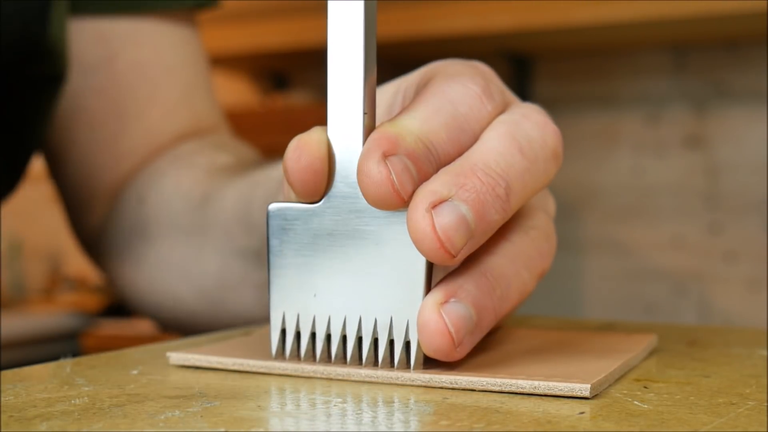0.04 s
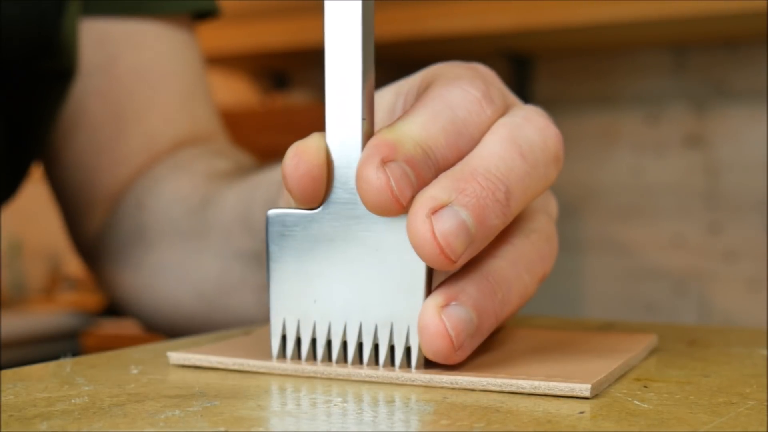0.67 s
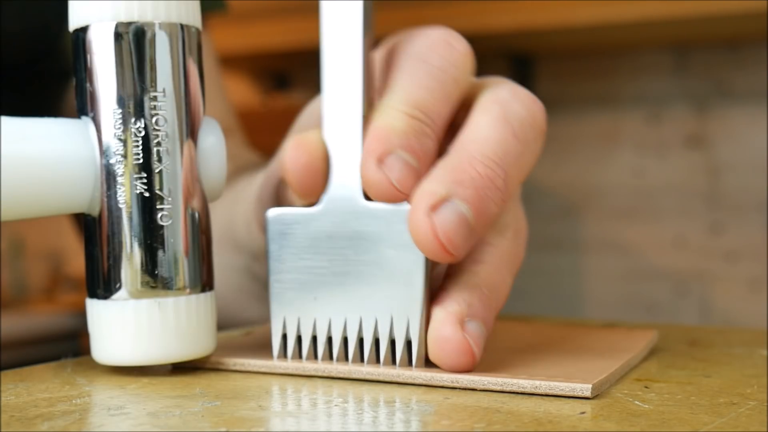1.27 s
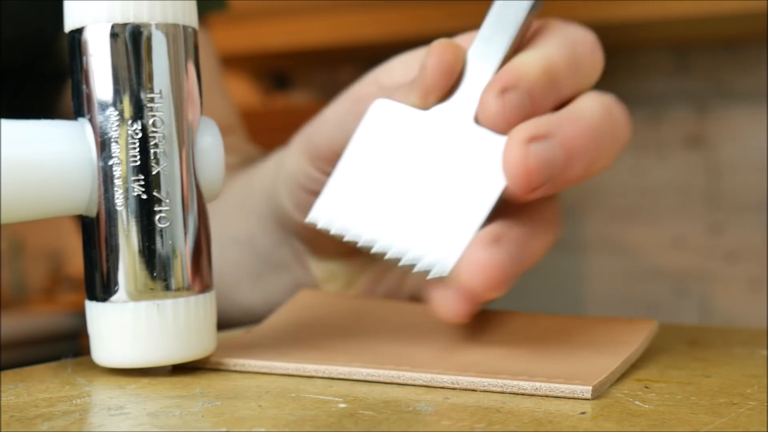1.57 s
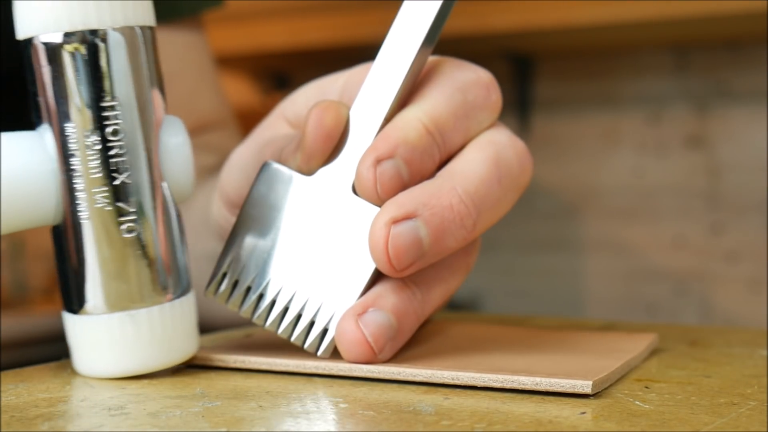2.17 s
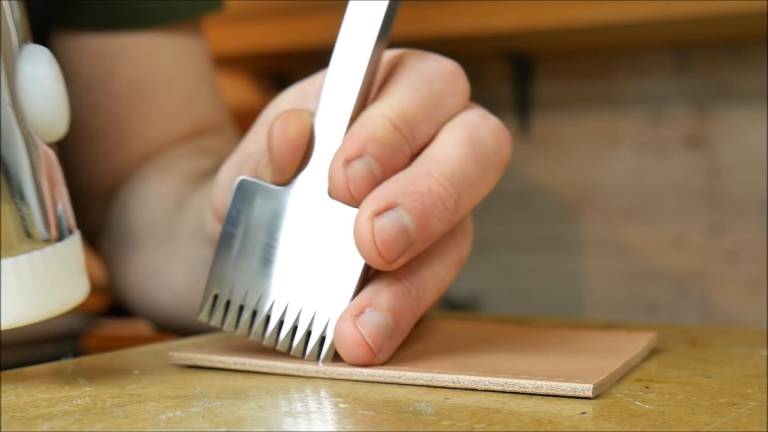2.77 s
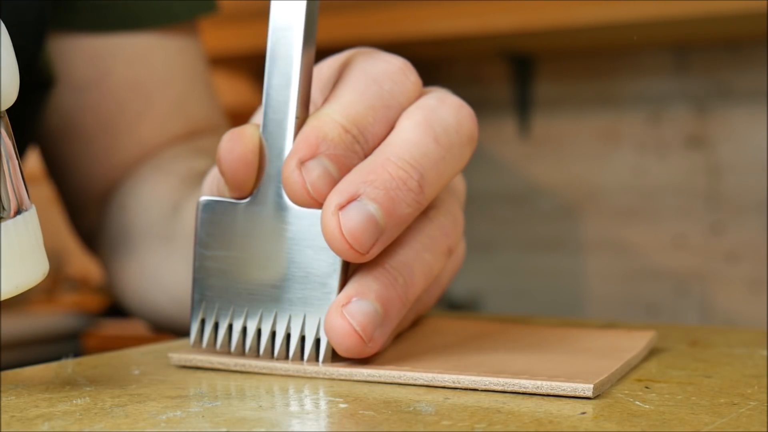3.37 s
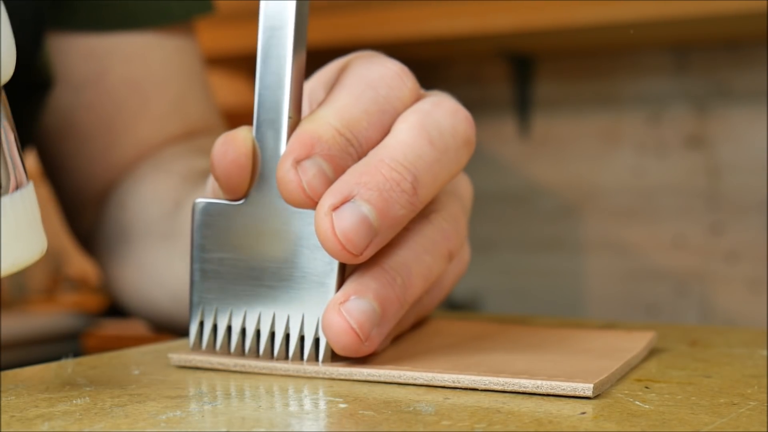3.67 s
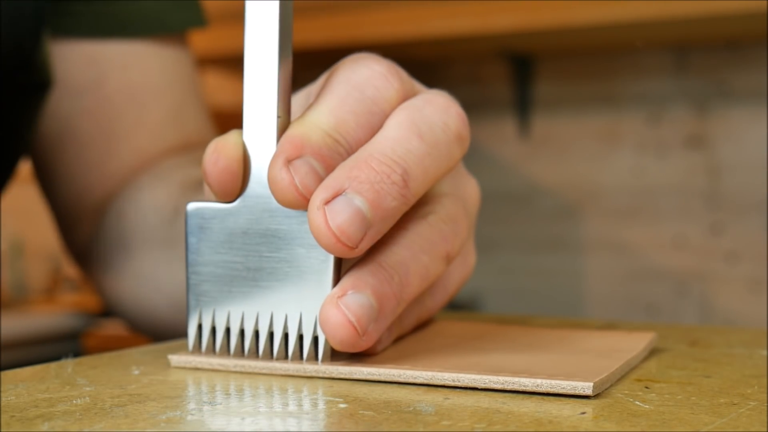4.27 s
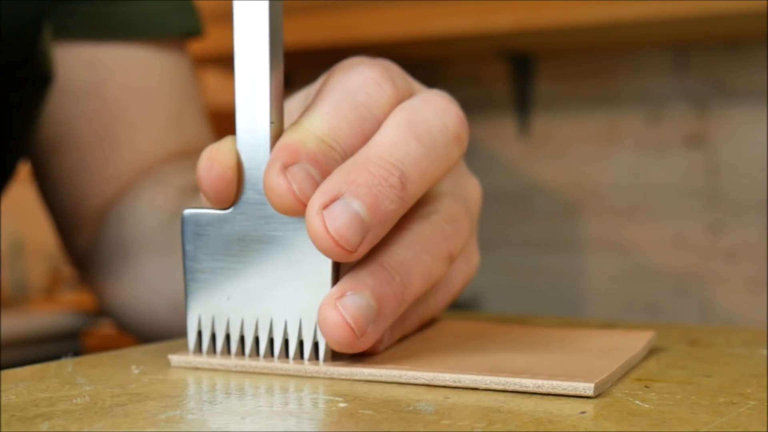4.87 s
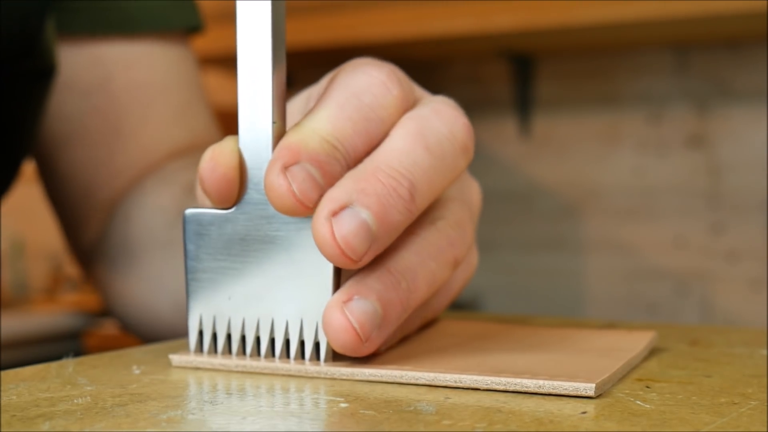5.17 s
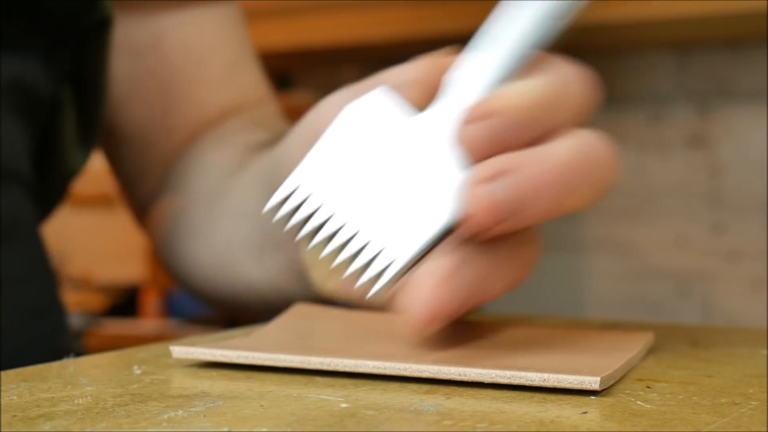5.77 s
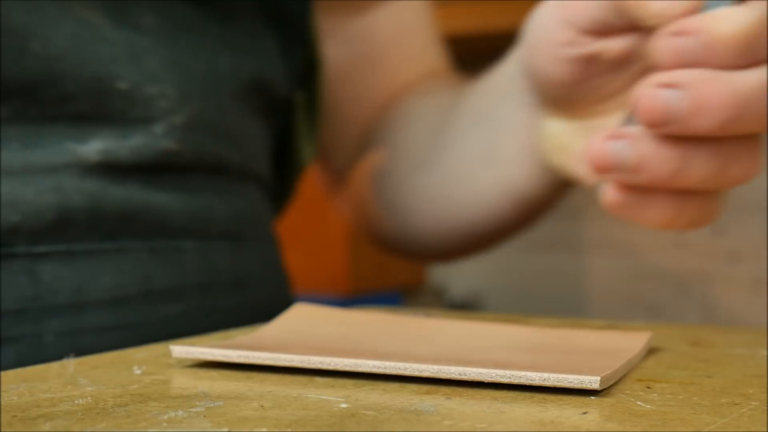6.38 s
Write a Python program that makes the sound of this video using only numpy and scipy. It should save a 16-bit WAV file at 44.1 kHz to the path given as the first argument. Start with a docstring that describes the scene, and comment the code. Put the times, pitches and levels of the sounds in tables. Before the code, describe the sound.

A plastic-faced mallet strikes a toothed steel punch into leather on a wooden bench at about 0.2 seconds, then harder at 0.6. Each blow is a sharp, close knock with a brief metallic ring and a low bench thump, slightly overloading the microphone, followed by small clicks and the quick rattle of a loose object settling. Around 1.2 seconds the mallet is set down with a soft thud and a few clicks. Very faint leather rubs and a slight bump follow until about 2.4 as the punch is pulled out and moved. After a near-silent pause, a duller setting blow lands at 4.5 seconds and a hard, cracking one at 4.9, leaving a faint steel ring and bench rumble. From 5.2 to 6.4, barely audible rubs and finger ticks come as the punch is worked loose. Behind everything is a small quiet workshop with soft arm rustle.

```python
"""A nylon-faced mallet drives a steel pricking iron into leather on a wooden bench: a setting blow, then
a hard one, twice over. The blows bounce the iron, ring and sway the bench and overload the close
microphone; the first two set a loose object chattering. Between the pairs the mallet is put down and
the iron is pulled out and moved along, with clicks and leather rubs; after the last it is worked loose
again. Behind it all: a small quiet workshop, with soft swells of arm rustle and bench rumble."""
import sys
import numpy as np
from scipy import signal
from scipy.fft import rfft, irfft
from scipy.io import wavfile

SR = 44100
rng = np.random.default_rng(int(sys.argv[2]) if len(sys.argv) > 2 else 0)


def waveform_to_disk(signal):
    """Save audio, clipped to [-1, 1], as 16-bit WAV at the path in sys.argv[1]."""
    frames = np.transpose(np.atleast_2d(signal))
    scaled = np.clip(frames, -1, 1) * 32767
    samples = np.round(scaled).astype(np.int16)
    wavfile.write(sys.argv[1], SR, samples)


N = 284004
TIME_S = np.arange(N) / SR
AGE_S = TIME_S[:SR * 3 // 5]   # time since a contact
BANDS_HZ = 50 * 2 ** (np.arange(34) / 4)

# Spectra. Each row: frequency in Hz, relative density in dB.
ROOM_TONE_SPECTRUM = [(25, -6), (60, -10), (90, -6), (128, 0), (160, -11), (240, -12.5), (360, -25.5),
                      (600, -28.5), (1200, -33.5), (3000, -38), (8000, -40), (15500, -41.5)]
LOW_SWELL_SPECTRUM = [(60, -11.5), (220, 0), (450, -6), (1000, -16.5), (2400, -19), (6000, -27.5),
                      (15000, -40.5)]
RUB_SPECTRUM = [(200, 0.5), (1200, 5), (3000, 3.5), (6000, -1), (8700, 2.5), (10500, -14), (14000, -4),
                (16000, -26)]
CLICK_SPECTRUM = [(60, -26.5), (200, -3.5), (600, -4), (1500, 2.5), (3000, -2.5), (6000, -1.5), (9200, -2),
                  (10800, -9.5), (14000, -10), (16000, -23.5)]
CHATTER_SPECTRUM = [(100, -25.5), (420, -16.5), (600, -25), (800, -25), (1200, -25), (1500, -31),
                    (1950, -27), (2500, -41), (4000, -60), (15000, -79.5)]
CRACK_SPECTRUM = [(300, -8), (1500, 3), (2500, 8), (4500, 1), (8000, -7), (15000, -14.5)]
TAIL_SPECTRUM = [(60, -14.5), (130, -6), (220, -4), (310, -6.5), (420, -3), (700, -10), (1250, -6.5),
                 (1600, -8.5), (2000, -7), (3000, -21), (5000, -22.5), (9000, -32), (13500, -36),
                 (16000, -49)]   # dense ring of bench and room

# Modes. Each row: frequency in Hz, relative level in dB, T60 in seconds.
SWAY_MODES = [(28.4, -39.5, 2.1), (34.8, -44, 2.7), (43.6, -32, 1.3), (54.93, -46.5, .9), (66, -38, 0.66),
              (88, -37.5, 0.73), (113.5, -45, 0.93)]   # bench rocking on its legs
BENCH_MODES = [(122, -26, .13), (155, -21, 0.026), (215.6, -12.5, 0.16), (249, -25, 0.028),
               (335, -26.5, 0.15), (390, -20, 0.21), (486, -25.5, .14), (770, -21.5, .03)]   # bench top
TOOL_MODES = [(1078, -73, 5.9), (1726, -67.5, 2.1), (2900, -81.5, 1.0), (6160, -80, .9)]   # steel tools nearby
IRON_MODES = [(928, -30.5, 0.11), (1218, -24, 0.25), (1247, -27, 0.13), (1295.7, -30, 0.22),
              (1469, -24, .22), (1578, -31.5, 0.081), (1993, -31.5, 0.16), (1977, -30.5, 0.25),
              (2110, -31.5, .16), (2574, -29.5, .14), (2910, -32, .12), (3370, -32.5, 0.09)]   # hand-damped iron and mallet head

# Workshop decay. Each row: frequency in Hz, T60 in seconds.
ROOM_DECAY = [(80, .4), (200, .3), (500, .28), (1300, .3), (3000, .26), (8000, .21), (15000, .175)]
# Soft low swells: arm rustle, and the bench's rumble lingering after the last blow.
# Each row: centre in seconds, half-width in seconds, level in dB.
LOW_SWELLS = [(.9, 1.6, -75), (4.35, .3, -72.5), (5.18, .22, -69), (5.75, .5, -75)]
# Slides on leather. Each row: peak in seconds, swell in seconds, level in dB, tilt in dB per octave.
SLIDES = [(1.52, .09, -74.5, -1), (1.722, .03, -70, 1), (2.26, 0.13, -77.5, -4.5), (5.23, .12, -80, 0.5),
          (5.52, 0.13, -72.5, -1.5), (5.775, .12, -72.5, 3), (6.41, .1, -73.5, -2)]
# Iron, mallet and finger contacts. Each row: start in seconds, level in dB, tilt in dB per octave.
LIGHT_CONTACTS = [(0.24, -29, 1), (.2620, -24.5, -1.5), (0.27, -35.5, 5), (0.695, -27, 0.5),
                  (1.172, -51.5, -3), (1.229, -43, -5), (1.246, -34.5, -3), (1.3076, -37, -0.5),
                  (2.411, -58.5, -6.5), (3.6825, -56.5, -4), (4.48, -31, 3.5), (5.4685, -57, -1.5),
                  (5.642, -54.5, -5.5), (6.038, -57, -0.5)]
# Mallet head landing on the bench. Each row: start in seconds, level in dB, contact corner in Hz.
HEAD_BUMPS = [(1.2391, -22, 257.5), (1.257, -36, 328), (2.135, -45, 220)]
# Bounce runs of the loose object. Each row: first landing in seconds, first gap in seconds.
CHATTER_RUNS = [(.336, .032), (.828, .0415)]
# Mallet blows. Each row: start in seconds, force in dB, contact corner in Hz, teeth crack in dB,
# iron bounce in Hz, bounce level in dB, bounce T60 in seconds, sway in dB, tool ring in dB.
MALLET_BLOWS = [(0.2170, -1, 2498, -14, 1130, -3, 0.018, -3, -13),
                (0.6175, 2, 2860, -1, 2030, 8.5, 0.0075, 0, -3),
                (4.453, -7, 1237, -9, 1135, 2, 0.028, -4, -13.5),
                (4.854, 2.5, 1920, -0.5, 1242, 10.5, 0.013, 2.5, 3)]


def from_db(db):
    """Decibels to gain."""
    return 10 ** (np.asarray(db) / 20)


def at_hz(points, hz):
    """Table lookup on a log-frequency axis."""
    known_hz, values = np.transpose(points)
    return np.interp(np.log(np.maximum(hz, 1)), np.log(known_hz), values)


def tilted(spectrum, db_per_oct):
    """Spectrum tilted about 3 kHz."""
    return [(hz, db + db_per_oct * np.log2(hz / 3000)) for hz, db in spectrum]


def add(track, start_s, sound):
    """Mix a sound into the track."""
    start = int(round(start_s * SR))
    track[start:start + len(sound)] += sound[:N - start]


def swell(peak_s, half_width_s):
    """Gaussian rise and fall."""
    return np.exp(-((TIME_S - peak_s) / half_width_s) ** 2)


def noise(spectrum):
    """Steady shaped noise."""
    gain = from_db(at_hz(spectrum, np.fft.rfftfreq(N, 1 / SR)))
    return irfft(rfft(rng.standard_normal(N)) * gain, N)


def butter(x, hz, kind):
    """Butterworth filter, 12 dB per octave."""
    return signal.sosfilt(signal.butter(2, hz, kind, fs=SR, output="sos"), x)


def soften(x, corner_hz):
    """A soft contact cuts the treble."""
    return butter(x, min(corner_hz, SR / 3), "low")


def ring(modes, age_s=AGE_S):
    """Struck modes: decaying sines of alternating sign."""
    return sum((-1) ** k * from_db(db - 60 * age_s / t60_s) * np.sin(2 * np.pi * hz * age_s)
               for k, (hz, db, t60_s) in enumerate(modes))


def snap(t60_s):
    """Decaying white burst."""
    return rng.standard_normal(len(AGE_S)) * from_db(-60 * AGE_S / t60_s)


def coloured(x, spectrum):
    """Minimum-phase shaping: nothing precedes the attack."""
    size = 2 * len(x)
    gain = from_db(at_hz(spectrum, np.fft.rfftfreq(size, 1 / SR)))
    cepstrum = irfft(np.log(gain))
    cepstrum[1:len(x)] *= 2
    cepstrum[len(x) + 1:] = 0
    return irfft(rfft(x, size) * np.exp(rfft(cepstrum)))[:len(x)]


def background(tone_db=-67):
    """Room tone and soft low swells of arm rustle and lingering bench rumble."""
    tone, low = noise(ROOM_TONE_SPECTRUM), noise(LOW_SWELL_SPECTRUM)
    swells = sum(from_db(db) * swell(centre_s, half_s) for centre_s, half_s, db in LOW_SWELLS)
    return from_db(tone_db) * tone / tone.std() + swells * low / low.std()


def room_bands(early_db=3, spacing_s=.0015, merge_s=.04):
    """Room decay, one row per quarter octave. Early treble reflections arrive singly, then merge."""
    white = rng.standard_normal((2, 2 * len(AGE_S)))
    edge = 2 ** (1 / 8)
    bands = np.array([butter(white[k % 2], [hz / edge, hz * edge], "band")[len(AGE_S):]
                      for k, hz in enumerate(BANDS_HZ)])
    early = np.interp(AGE_S / spacing_s, np.arange(1000), rng.standard_normal(1000))
    early *= np.exp(-AGE_S / merge_s)
    treble = BANDS_HZ[:, None] > 1500
    t60_s = at_hz(ROOM_DECAY, BANDS_HZ)[:, None]
    return bands * from_db(early_db * early * treble - 60 * AGE_S / t60_s)


def leather_rubs(grain_db=3, release_ratio=.48):
    """Fibres catch and let go under sliding teeth and fingers; each slide swells, then stops."""
    out = np.zeros(N)
    for peak_s, swell_s, db, db_per_oct in SLIDES:
        catches = np.interp(TIME_S, np.linspace(0, N / SR, 2000), rng.standard_normal(2000))
        slide = swell(peak_s, np.where(TIME_S < peak_s, swell_s, release_ratio * swell_s))
        out += from_db(db + grain_db * catches) * slide * noise(tilted(RUB_SPECTRUM, db_per_oct))
    return out


def finger_ticks(count=5, span_s=(5.35, 6.35), level_db=-64, spread_db=2, db_per_oct=-2):
    """Fingers tick on the iron as they work it loose. Rows as in LIGHT_CONTACTS."""
    return [(np.interp(when, [0, 1], span_s), level_db + spread_db * (2 * strength - 1), db_per_oct)
            for when, strength in rng.random((count, 2))]


def clicks(room, direct_db=1, t60_s=.014, room_db=-19):
    """Light contacts, each with a little room after it."""
    out = np.zeros(N)
    for start_s, db, db_per_oct in LIGHT_CONTACTS + finger_ticks():
        touch = from_db(direct_db) * snap(t60_s) + from_db(room_db) * room.sum(axis=0)
        add(out, start_s, from_db(db) * coloured(touch, tilted(CLICK_SPECTRUM, db_per_oct)))
    return out


def bench_sway(onset_s=.036):
    """The heavy bench takes a moment to start rocking."""
    return ring(SWAY_MODES, TIME_S) * (1 - np.exp(-TIME_S / onset_s))


def mallet_bumps(room, head_hz=190, head_db=-1, head_t60_s=.038, room_db=1, sway_db=13):
    """Put down, the soft face wakes only the low bench modes and rocks the bench a little."""
    out = np.zeros(N)
    tail = from_db(room_db + at_hz(TAIL_SPECTRUM, BANDS_HZ)) @ room
    body = ring(BENCH_MODES) + ring([(head_hz, head_db, head_t60_s)]) + tail
    for start_s, db, corner_hz in HEAD_BUMPS:
        add(out, start_s, from_db(db) * soften(body, corner_hz))
        add(out, start_s, from_db(db + sway_db) * bench_sway())
    return out


def chatter(room, level_db=-1, t60_s=.019, onset_s=.0013, room_db=-16):
    """A loose object settles on the shaken bench: knocks ever faster, weaker and duller."""
    restitution, weak_gap_s, rest_gap_s = .9, .019, .011
    corner_hz_per_s = 68000   # shorter hops land more softly
    out = np.zeros(N)
    onset = 1 - np.exp(-AGE_S / onset_s)
    for landing_s, gap_s in CHATTER_RUNS:
        while gap_s > rest_gap_s:
            touch = (snap(t60_s) + from_db(room_db) * room.sum(axis=0)) * onset
            knock = soften(coloured(touch, CHATTER_SPECTRUM), corner_hz_per_s * gap_s)
            strength = from_db(level_db) / (1 + (weak_gap_s / gap_s) ** 4)
            add(out, landing_s, strength * knock)
            landing_s += gap_s
            gap_s *= restitution
    return out


def tool_ring(beat_hz=6.98, twin_db=-1):
    """Nearby steel rings on; its lowest mode beats against a close twin."""
    hz, db, t60_s = TOOL_MODES[0]
    return ring(TOOL_MODES, TIME_S) - ring([(hz + beat_hz, db + twin_db, t60_s)], TIME_S)


def overload_thump(level_db=-23, pulse_s=.004, recover_hz=25):
    """One deep pulse under each blow as the overloaded microphone recovers."""
    pulse = -from_db(level_db) * np.sin(np.pi * np.minimum(AGE_S / pulse_s, 1)) ** 2
    return butter(pulse, recover_hz, "high")


def bench_top(force_db, push_db=2, push_s=.0012, ring_db=-3.5, radiate_hz=85):
    """A push that follows the force, plus a ring that does not. The board radiates little deep bass."""
    push = np.sin(np.pi * np.minimum(AGE_S / push_s, 2)) * np.exp(-AGE_S / push_s / 2)
    board = from_db(push_db + force_db) * push + from_db(ring_db) * ring(BENCH_MODES)
    return butter(board, radiate_hz, "high")


def iron_bounce(hz, db, t60_s, contact_s=.0045):
    """The iron bounces on the leather only while the mallet presses on it."""
    pressed = 1 / (1 + (AGE_S / contact_s) ** 10)
    return pressed * ring([(hz, db, t60_s)])


def excitation(hz, corner_hz, teeth_db, bounce_hz, hump_db, width_hz=190):
    """A blow's gain per frequency: dull thud, crack above it, hump around the bounce."""
    thud_power = 1 / (1 + (hz / corner_hz) ** 6)
    crack_power = (1 - thud_power) * from_db(teeth_db) ** 2
    hump = from_db(hump_db) / (1 + ((hz - bounce_hz) / width_hz) ** 2)
    return np.sqrt(thud_power + crack_power + hump ** 2)


def iron_ring(contact, level_db=-2):
    """Iron and mallet head ring briefly, each mode as hard as the contact drives it."""
    return ring([(hz, db + level_db + 20 * np.log10(excitation(hz, *contact)), t60_s)
                 for hz, db, t60_s in IRON_MODES])


def blow_tail(room, contact, force_db, level_db=-.5, force_share=.7, onset_s=.003):
    """Dense ring of bench and room; grows less than the force."""
    band_db = level_db + force_share * force_db + at_hz(TAIL_SPECTRUM, BANDS_HZ)
    drive = excitation(BANDS_HZ, *contact) * from_db(band_db)
    return (drive @ room) * (1 - np.exp(-AGE_S / onset_s))


def mallet_blows(room, crack_db=4, crack_t60_s=.012, feed_db=-15):
    """The mallet pushes the bench top and bounces the iron; on hard blows the teeth crack through."""
    out, sway, tools = np.zeros(N), bench_sway(), tool_ring()
    for (start_s, force_db, corner_hz, teeth_db,
         bounce_hz, bounce_db, bounce_t60_s, sway_db, tools_db) in MALLET_BLOWS:
        bounce = soften(iron_bounce(bounce_hz, bounce_db, bounce_t60_s), 2 * corner_hz)
        crack = from_db(crack_db + teeth_db) * coloured(snap(crack_t60_s), CRACK_SPECTRUM)
        # a longer bounce feeds more into the ring and the room
        hump_db = feed_db + bounce_db - force_db + 20 * np.log10(bounce_t60_s / crack_t60_s)
        contact = corner_hz, teeth_db, bounce_hz, hump_db
        impact = from_db(force_db) * (overload_thump() + crack + iron_ring(contact))
        add(out, start_s, bench_top(force_db) + bounce + impact + blow_tail(room, contact, force_db))
        add(out, start_s, from_db(sway_db) * sway + from_db(tools_db) * tools)
    return out


def scene():
    """All sources in one workshop, mono."""
    room = room_bands()
    contacts = mallet_blows(room) + chatter(room) + clicks(room) + mallet_bumps(room)
    return (contacts + leather_rubs() + background())[None]


def record(dry):
    """The input clips flat on the blows; a steep low-pass cuts the top."""
    ceiling, cutoff_hz = .9, 16400
    lowpass = signal.ellip(10, .1, 80, cutoff_hz, fs=SR, output="sos")
    return signal.sosfilt(lowpass, np.clip(dry, -ceiling, ceiling))


dry = scene()
out = record(dry)
waveform_to_disk(out)
```